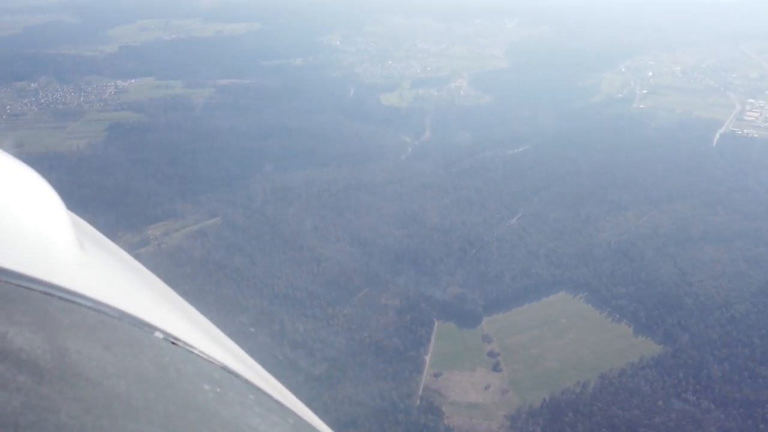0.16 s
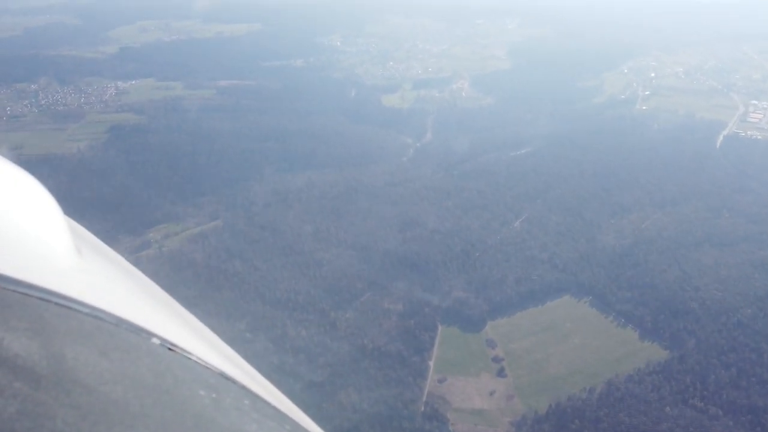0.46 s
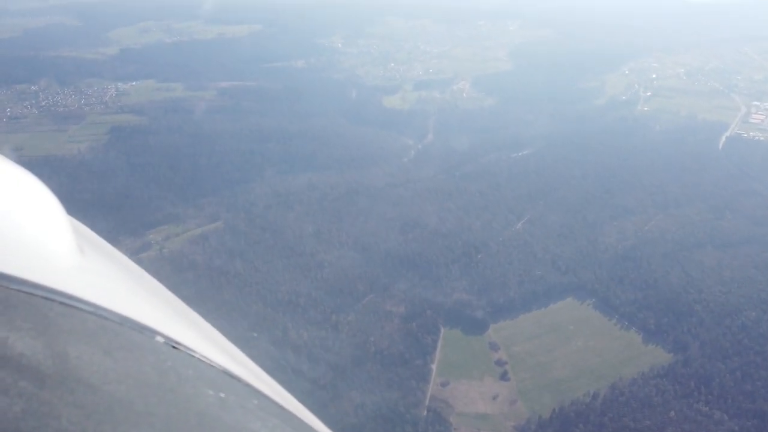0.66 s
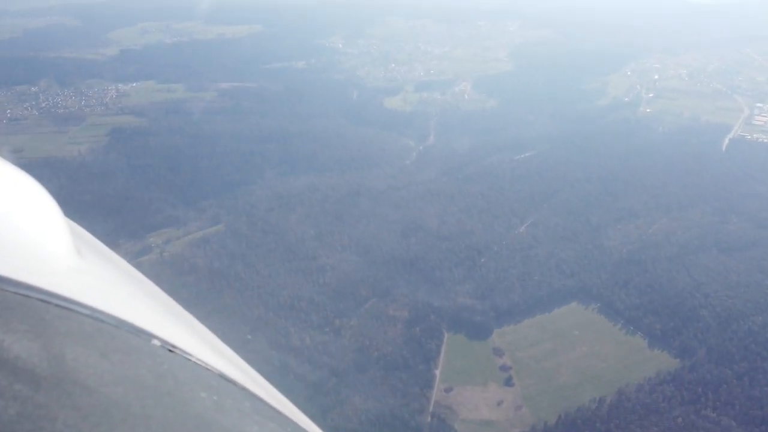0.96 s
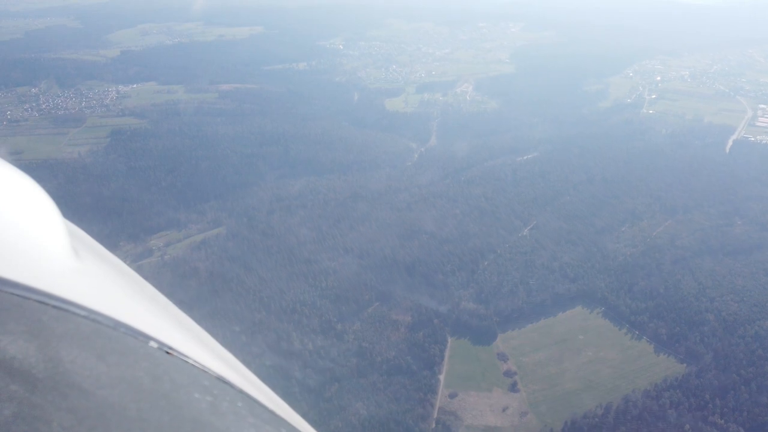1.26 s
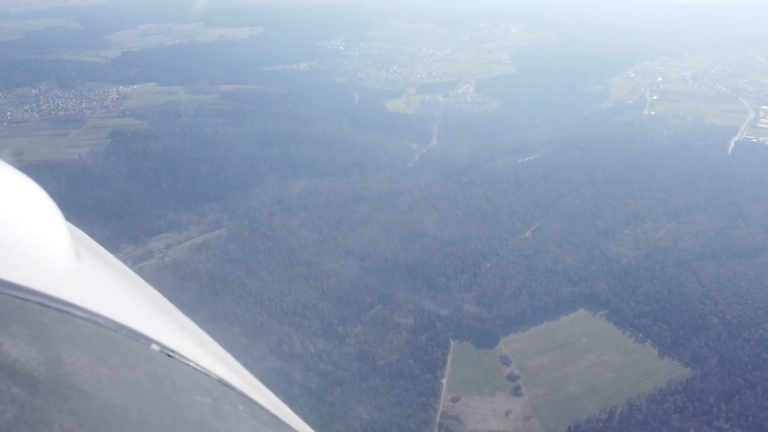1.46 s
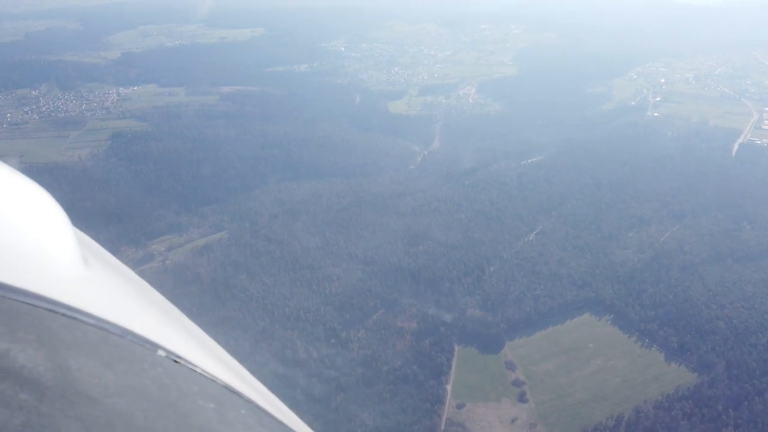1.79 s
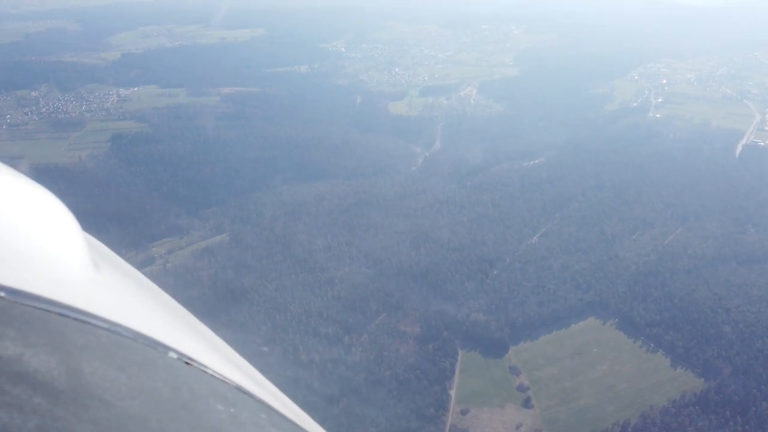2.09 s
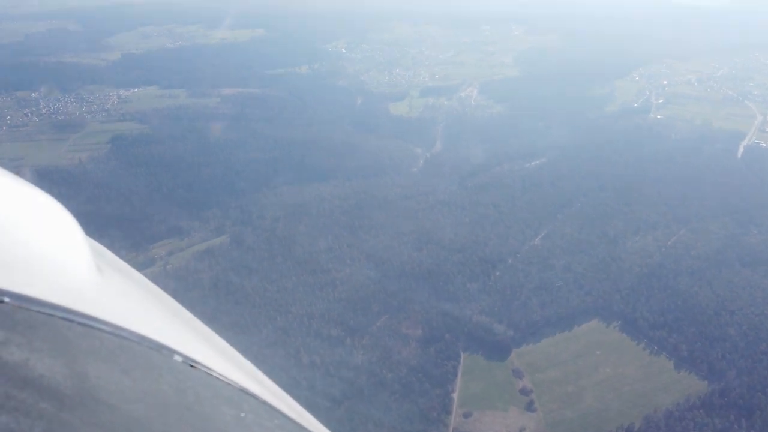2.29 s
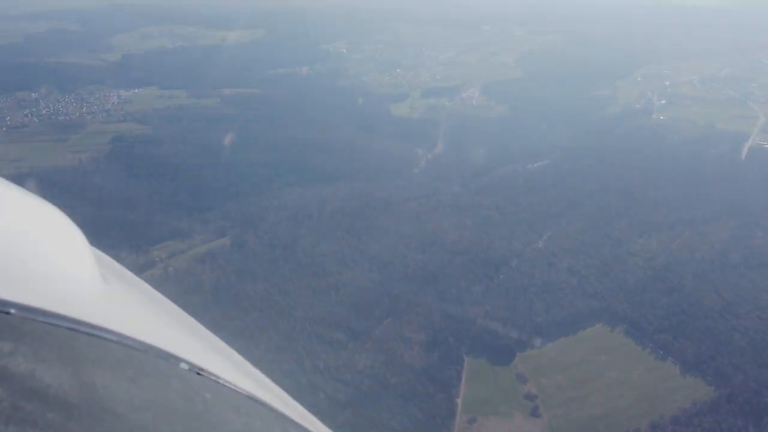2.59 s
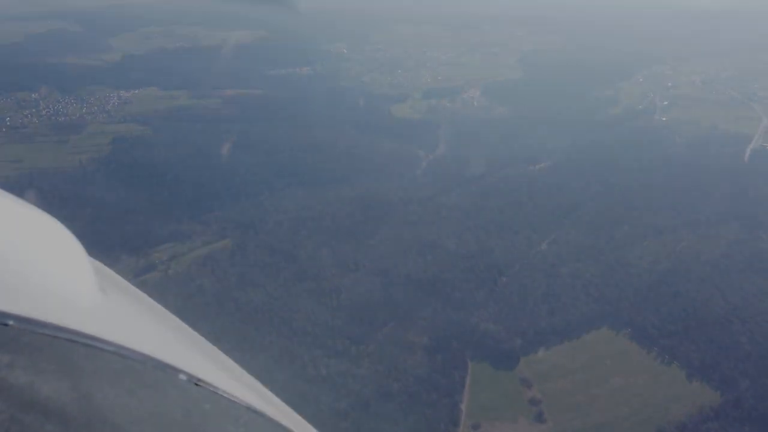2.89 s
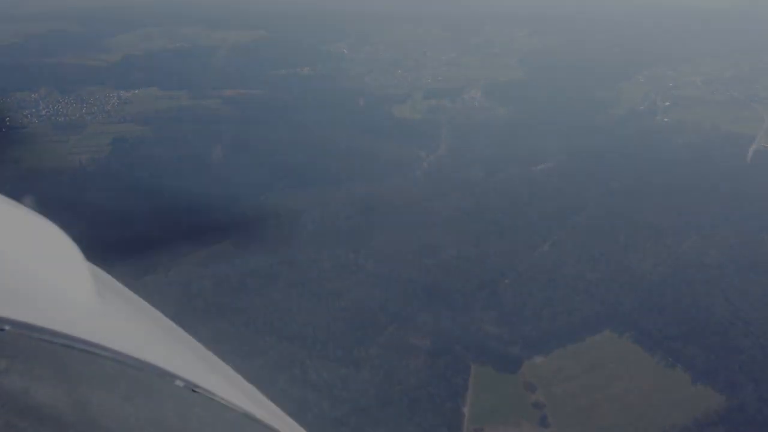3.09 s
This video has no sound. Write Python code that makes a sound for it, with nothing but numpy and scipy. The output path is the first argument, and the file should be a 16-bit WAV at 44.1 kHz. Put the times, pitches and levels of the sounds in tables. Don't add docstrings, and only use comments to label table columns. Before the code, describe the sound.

A small aircraft engine and propeller drone throughout, a low, buzzing hum near 90 Hz whose blade tones swell and fade while pitch sags very slightly. Boomy cabin air roar and softer rush surround it; buffeting peaks around 1.2 s, with two soft panel knocks near 1.3 s. Faint high vent whistles come and go, longest from 2.1 to 2.9 s, over fine fluttering trim hiss. Close stereo, cut off mid-flight.

```python
import sys
import numpy as np
from scipy import signal
from scipy.fft import rfft, irfft, next_fast_len
from scipy.io import wavfile
from scipy.ndimage import uniform_filter1d, map_coordinates

SR = 44100
rng = np.random.default_rng(int(sys.argv[2]) if len(sys.argv) > 2 else 0)


def dump(signal):
    limited = np.clip(np.atleast_2d(signal).T, -1, 1)
    pcm = np.round(limited * 32767).astype(np.int16)
    wavfile.write(sys.argv[1], SR, pcm)


def nominal_scale(level):
    x = np.asarray(level, float) / 20
    return 10 ** x


N = 143325
T = np.arange(N) / SR
GEAR, BLADES = 21 / 51, 3


def unit(x):
    return x / np.sqrt(np.mean(x ** 2) + 1e-20)


def along(points, hz):
    f, v = np.transpose(points)
    return np.interp(np.log(hz + 1), np.log(f + 1), v)


def curves(rows):
    s, *columns = np.transpose(rows)
    return [np.interp(T, s, column) for column in columns]


def wobble(rate):
    grid = np.arange(2000)
    smooth = map_coordinates(rng.standard_normal(200), [grid * rate / 500])
    return np.interp(T * 500, grid, smooth)


def filtered(x, response):
    margin = 2048
    m = next_fast_len(N + 4 * margin)
    wide = np.pad(x, [(0, 0), (margin, margin)], mode="reflect", reflect_type="odd")
    return irfft(rfft(wide, m) * response(np.fft.rfftfreq(m, 1 / SR)), m)[..., margin:margin + N]


# frequency in Hz, likeness (1 = identical).
PORT_LIKENESS = [(100, 1), (300, .993), (600, .98), (800, .9), (1000, .84), (1400, .5), (2500, .15),
                 (10000, .3)]


def air(shape_db, patchy_db, alike=PORT_LIKENESS):
    z = signal.stft(rng.standard_normal((2, N)), nperseg=1024)[2]
    field = uniform_filter1d(rng.standard_normal(z.shape[1:]), size=9, axis=0)
    field = uniform_filter1d(field, size=4, axis=1)
    pair = signal.istft(z * nominal_scale(patchy_db * unit(field)), nperseg=1024)[1][:, :N]

    def split(hz):
        angle = np.arccos(np.clip(along(alike, hz), -1, 1)) / 2
        return nominal_scale(shape_db(hz)) * [np.cos(angle), np.sin(angle)]

    mid, side = filtered(pair, split)
    return unit(np.array([mid + side, mid - side]))


def tone(turns, db, sway_db, sway_rad, rate):
    phase = 2 * np.pi * (turns + rng.random()) + sway_rad * wobble(rate)
    return np.sqrt(2) * nominal_scale(db + sway_db * wobble(rate)) * np.sin(phase)


# time in seconds, crankshaft speed in turns per second.
CRANK_SPEED = [(0.0, 76.34), (0.5, 75.96), (1.0, 75.83), (1.5, 75.95), (2.0, 75.72), (2.4, 75.28),
               (2.8, 75.36), (3.25, 75.06)]


def crankshaft():
    return np.cumsum(curves(CRANK_SPEED)[0]) / SR


# time in seconds, buffeting level in dB.
GUST = [(0, -44), (0.4, -46), (0.9, -40), (1.15, -31.5), (1.6, -35), (1.85, -38), (2.4, -36), (2.9, -43),
        (3.25, -45)]
# frequency in Hz, level in dB per Hz.
BUFFET = [(12, -16.5), (22, -10), (40, -14), (60, -9.5), (90, -42), (200, -120)]
# frequency in Hz, level in dB per Hz.
ROAR = [(20, -20.5), (100, -3), (140, -8), (170, 1), (240, -11), (290, -7.5), (330, -12), (460, -9)]
# frequency in Hz, level in dB per Hz.
ROAR_TOP = [(460, -2), (520, -6), (660, -4), (780, -13.5), (900, -21.5), (1100, -27.5), (1400, -41),
            (2400, -120)]
# frequency in Hz, level in dB per Hz.
RUSH = [(530, -22), (900, 1), (1210, -6), (2440, -9), (4320, -22), (4860, -21), (5310, -23.5),
        (8870, -27.5), (9500, -21), (12400, -62), (20900, -120)]


def airflow():
    roar_db, rush_db = -31, -46.5
    gust_db, = curves(GUST)
    buffet = nominal_scale(gust_db + 1.2 * wobble(12)) * air(lambda hz: along(BUFFET, hz), patchy_db=.5)
    boom = air(lambda hz: along(ROAR, hz) + along(ROAR_TOP, hz), patchy_db=2.5)
    roar = nominal_scale(roar_db + .95 * wobble(3.05)) * boom
    rush = nominal_scale(rush_db + .25 * wobble(4)) * air(lambda hz: along(RUSH, hz), patchy_db=1.6)
    return buffet + roar + rush


# start in seconds, length in seconds, pitch in Hz, level in dB rms.
WHISTLES = [
    (0, 0.16, 4806, -61),
    (0.193, 0.27, 4800, -63),
    (0.612, 0.25, 4760, -64.5),
    (0.464, .2, 4760, -69),
    (.95, 0.19, 4785, -70),
    (1.117, 0.32, 4760, -74.5),
    (1.422, 0.15, 4800, -65),
    (1.707, 0.2, 4820, -71),
    (2.105, 0.84, 4744, -62),
    (3.032, 0.17, 4740, -68),
]
# centre in Hz, width in Hz, level in dB.
VENT_BREATH = (4880, 360, -73)


def vent():
    sag_hz, sag_s, edge_s = 16, .116, .045
    whistle = np.zeros(N)
    for start, length, hz, db in WHISTLES:
        since = np.clip(T - start, 0, None)
        gate = np.clip(np.minimum(T - start, start + length - T) / edge_s, 0, 1)
        gate = gate ** 2 * (3 - 2 * gate)
        pitch = hz - sag_hz * (1 - np.exp(-since / sag_s))
        whistle += gate * tone(np.cumsum(pitch) / SR, db, 2.2, .7, 16)
    centre_hz, width_hz, breath_db = VENT_BREATH
    breath = air(lambda hz: -20 * np.log10(1 + ((hz - centre_hz) / (width_hz / 2)) ** 4), patchy_db=3.0)
    louder_left = nominal_scale([[1.5], [-1.5]])
    return whistle * louder_left + nominal_scale(breath_db + 1.3 * wobble(3.8)) * breath


# time in seconds, peak level in dB.
KNOCKS = [
    (1.303, -30),
    (1.352, -22),
]


def panel():
    ring_hz, rise_s, t60_s = 665, .004, .1
    start, peak_db = np.array(KNOCKS).T[:, :, None]
    since = np.clip(T - start, 0, None)
    rings = nominal_scale(peak_db - 60 * since / t60_s) * (1 - np.exp(-since / rise_s))
    return np.sum(rings * np.sin(2 * np.pi * ring_hz * since), axis=0)


# moment as a share of a propeller turn, ringing pitch in Hz,
# width in Hz, level in dB, rise in seconds.
STRIKES = [
    (.23, 11100, 900, -50.5, .003),
    (.34, 11200, 1400, -51.5, .002),
    (.55, 10900, 900, -57, .0015),
    (.88, 11000, 900, -57, .002),
    (.92, 14600, 1600, -53.5, .006),
    (.95, 12700, 1000, -54, .005),
    (.26, 12700, 900, -56, .003),
]
# frequency in Hz, level in dB per Hz.
HISS = [(8000, -120), (9300, -16), (10000, -3), (10900, -4), (11800, -1.5), (12800, 3), (14100, -3),
        (15800, -5)]
# frequency in Hz, likeness (1 = identical).
TRIM_LIKENESS = [(8500, .15), (9600, .5), (10300, .62), (11200, .55), (11700, .15), (12700, .2),
                 (13800, .42), (15200, .15)]


def trim(turns):
    t60_s, scatter_db, scatter_turn, hiss_db = .045, 1.6, .02, -52.5
    turns_per_s = GEAR * CRANK_SPEED[0][1]
    rattle = np.zeros((2, N))
    for at, centre_hz, width_hz, db, rise_s in STRIKES:
        turn = np.floor(turns - at + 1).astype(int)
        size, late = rng.standard_normal((2, 200))[:, turn]
        since = ((turns - at) % 1 - scatter_turn * np.abs(late)) / turns_per_s
        ring = air(lambda hz: -20 * np.log10(1 + ((hz - centre_hz) / (width_hz / 2)) ** 2),
                   patchy_db=2.5, alike=TRIM_LIKENESS)
        decay = nominal_scale(db + scatter_db * size - 60 * since / t60_s)
        rattle += decay * np.clip(since / rise_s, 0, 1) * ring
    rattle = filtered(rattle, lambda hz: 1 / (1 + (9700 / (hz + 1)) ** 30))
    hiss = air(lambda hz: along(HISS, hz), patchy_db=3.8, alike=TRIM_LIKENESS)
    return nominal_scale(hiss_db + 2 * wobble(32)) * hiss + rattle


# time in # seconds, then the levels of the first, second, third and fourth blade tones in dB.
BLADE_LOADING = [(0.14, -36.5, -39, -71, -62), (0.25, -33.5, -27.5, -52, -48), (0.5, -29, -47, -48.5, -66),
                 (0.72, -33.5, -47, -40, -46), (0.88, -31.5, -34.5, -37.5, -40.5),
                 (1.1, -31, -44.5, -32.5, -54), (1.2, -43, -22.5, -36.5, -35), (1.32, -42, -24.5, -44, -41),
                 (1.41, -55, -32.5, -45, -58), (1.55, -47, -22.5, -37, -40.5),
                 (1.78, -35, -27.5, -41.5, -43), (2.06, -45, -33, -53, -36.5), (2.2, -38, -26.5, -39, -64),
                 (2.3, -36, -42, -55, -37.5), (2.5, -43, -28.5, -40, -42.5), (2.8, -44, -34.5, -39, -43),
                 (3.05, -40, -25, -39.5, -41), (3.25, -33.5, -32.5, -46, -49)]
# multiple of the propeller speed, level in dB rms.
UPPER_BLADE = [(5, -49), (15, -49), (18, -54), (21, -55), (23, -61), (24, -62), (27, -70), (102, -74)]


def propeller(turns):
    low = sum(tone(k * BLADES * turns, db, 1, .25 * k, 3.995)
              for k, db in enumerate(curves(BLADE_LOADING), 1))
    upper = sum(tone(k * turns, db, 3, 1.6, 8) for k, db in UPPER_BLADE)
    return low + upper


# multiple of the crank speed, level in dB rms of the two ports summed.
ENGINE_TONES = [(0.5, -47), (1, -35), (1.5, -47), (2, -50), (3, -50), (3.5, -44), (4.5, -56), (5, -53),
                (6, -40), (7, -59), (7.5, -44), (8, -41), (8.5, -58), (9, -52), (9.5, -53), (10, -50),
                (10.5, -65), (11, -58), (11.5, -66), (12, -66), (13, -66), (20, -78), (21, -67),
                (22.5, -75), (24, -70), (28.5, -73), (30, -73), (42, -79)]
# time in seconds,
# change in dB of the tone at 6 times crank speed, change in dB of the tone at 7.5 times.
SETTLING = [(0, -4, 3), (.4, -7, 4), (.6, 1.5, 0), (1.5, 2, 2), (2.2, 2, 0), (2.5, 1, -4), (3.25, 0, -3)]


def engine(crank):
    shift_db = dict(zip((6, 7.5), curves(SETTLING)))
    out = np.zeros(N)
    for k, db in ENGINE_TONES:
        lost_db = 20 * np.log10(np.cos(along(LEFT_LEAD, k * CRANK_SPEED[0][1]) / 2))
        out += tone(k * crank, db - lost_db + shift_db.get(k, 0), .6, .04 * np.sqrt(k), 6.72)
    return out


def scene():
    crank = crankshaft()
    blades = GEAR * crank
    return airflow() + vent() + panel() + trim(blades) + propeller(blades) + engine(crank)


# frequency in Hz, lead in radians.
LEFT_LEAD = [(100, .012), (190, .06), (400, .22), (600, .6), (800, 1.6), (1000, 2.26), (1400, 1.84),
             (2400, 1.55)]
# frequency in Hz, lead in radians.
TRIM_LEAD = [(8500, 0), (9300, -4.4), (9900, -3.3), (10800, -2.2), (11200, -1.2), (12100, .2),
             (13400, 1.55), (14600, 1.9)]


def microphone_ports(dry):
    top_hz, fade_s = 15800, .006

    def response(hz):
        lead = along(LEFT_LEAD, hz) + along(TRIM_LEAD, hz)
        return (hz < top_hz) * np.exp(.5j * lead * np.array([[1], [-1]]))

    fade = np.clip(np.minimum(2 * T, T[-1] - T) / fade_s, 0, 1)
    return filtered(dry, response) * np.sin(np.pi / 2 * fade) ** 2


def low_pass(x):
    return signal.sosfilt(signal.butter(12, 16270, fs=SR, output="sos"), x)


def record(dry):
    return low_pass(microphone_ports(dry))


dry = scene()
out = record(dry)
dump(out)
```